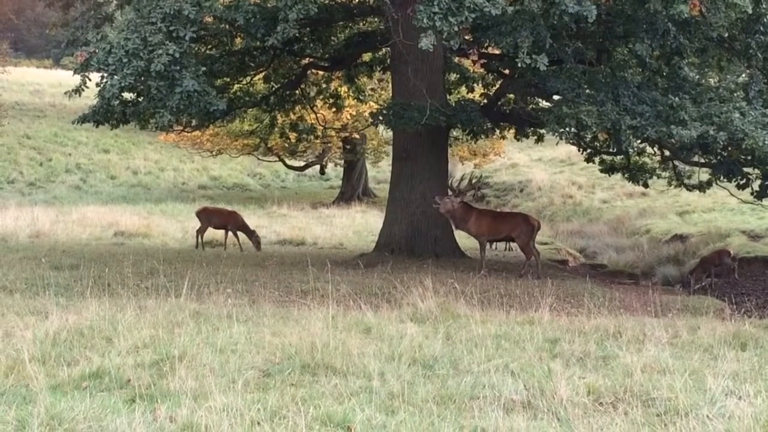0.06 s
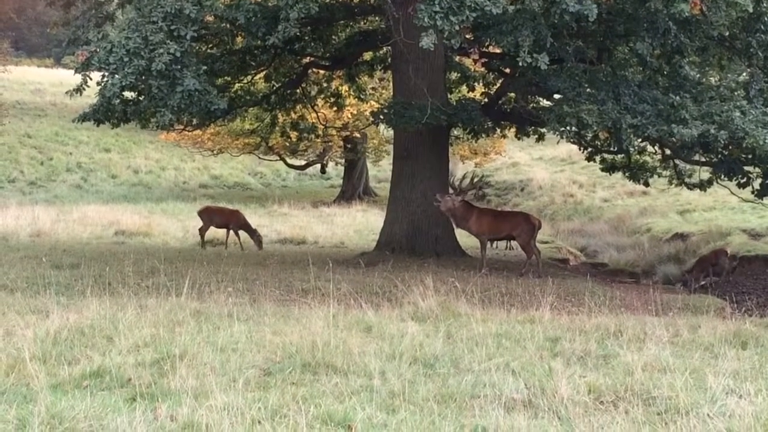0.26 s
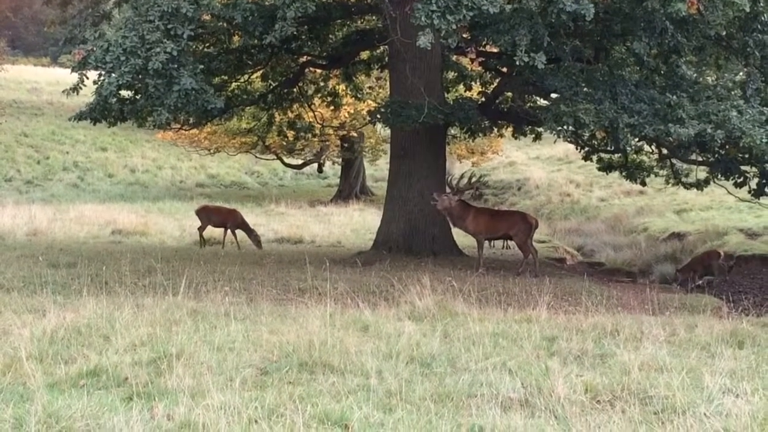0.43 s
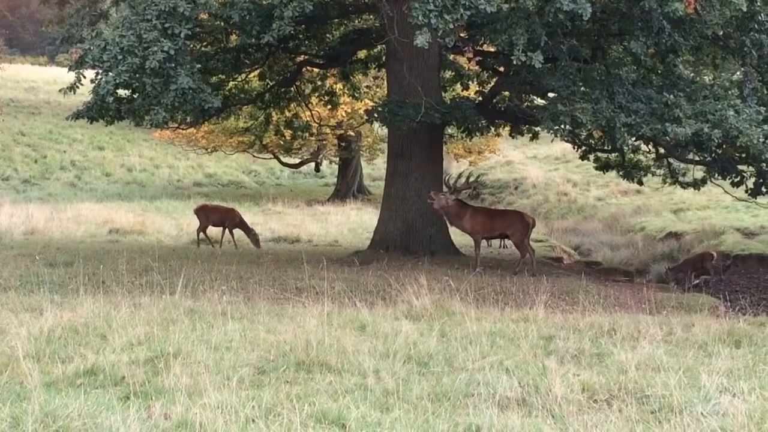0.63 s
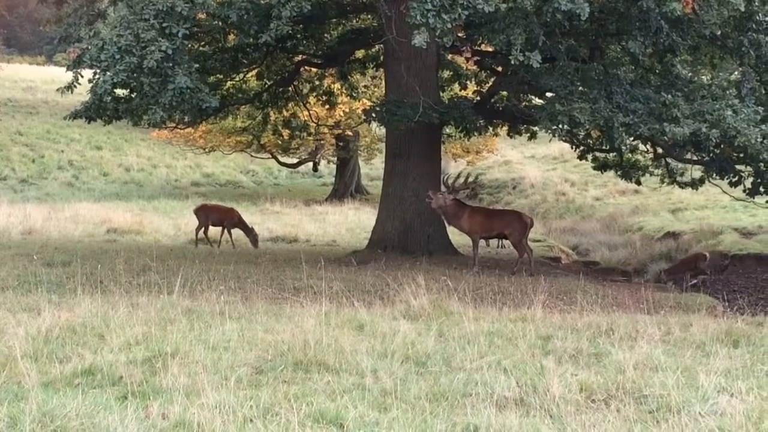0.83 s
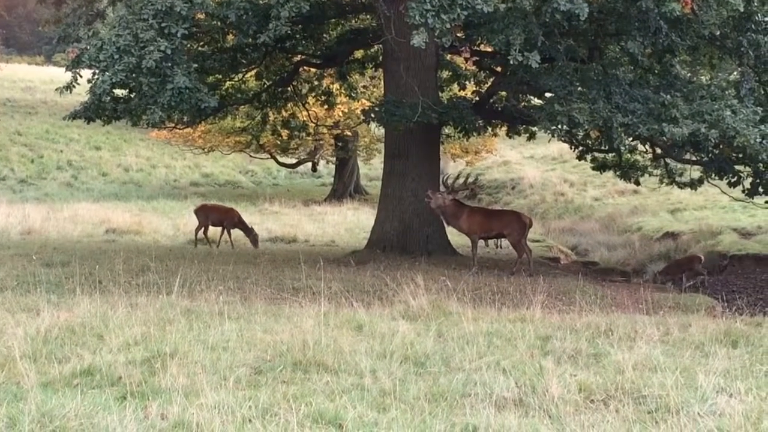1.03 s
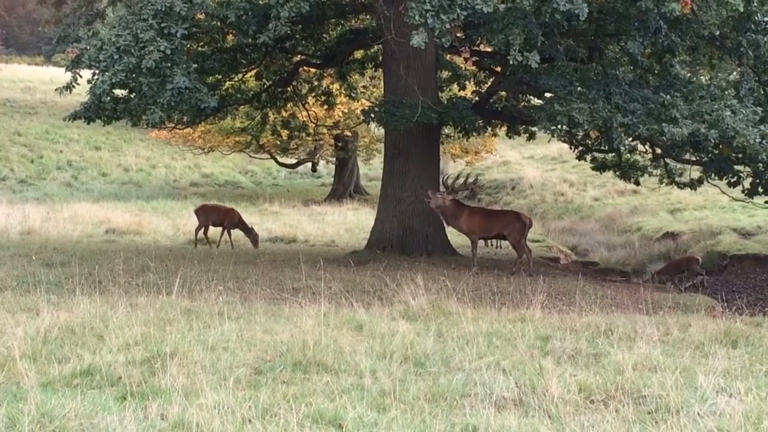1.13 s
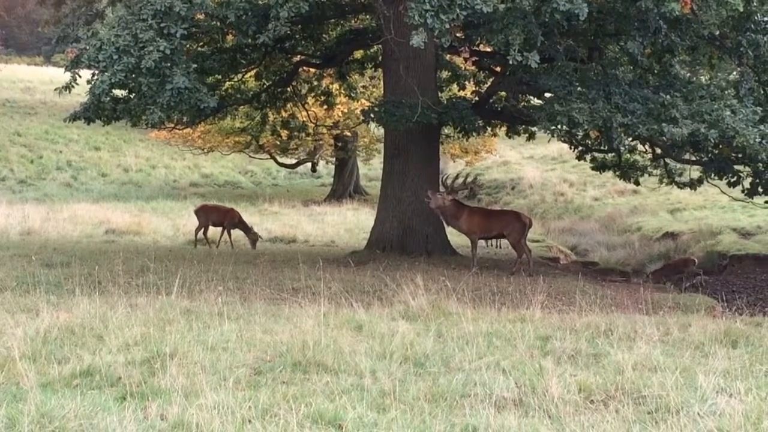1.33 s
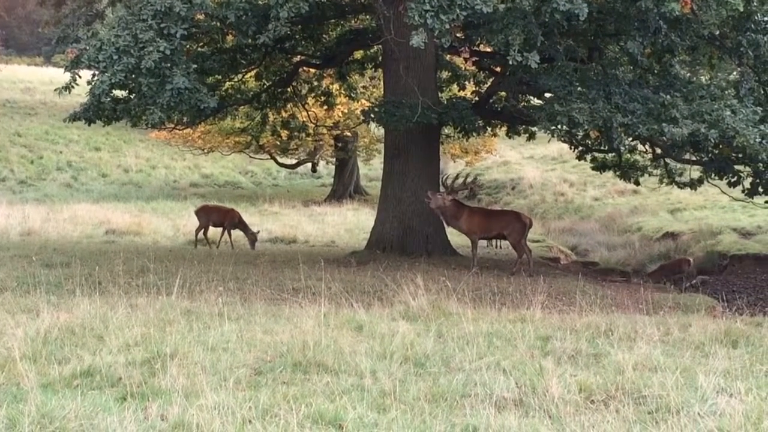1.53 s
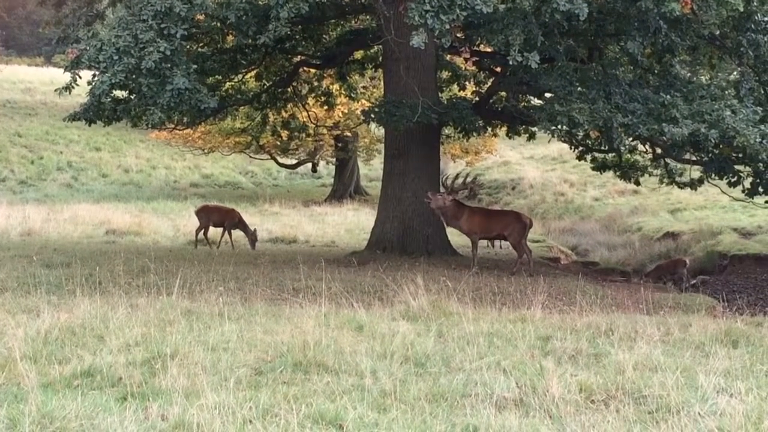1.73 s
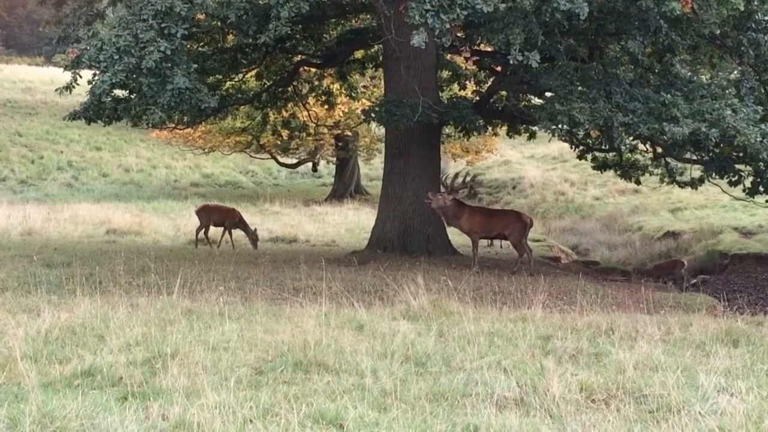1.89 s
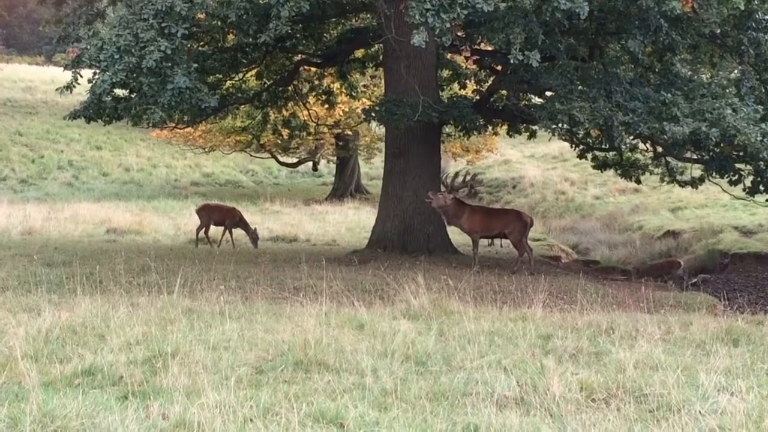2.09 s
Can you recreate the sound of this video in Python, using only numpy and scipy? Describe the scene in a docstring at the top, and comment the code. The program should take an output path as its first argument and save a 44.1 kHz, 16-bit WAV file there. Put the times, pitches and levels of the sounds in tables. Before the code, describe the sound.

A red deer stag gives one long, low, hoarse bellow in a quiet park.

```python
"""A quiet park: low distant rumble, one soft bump. Some way off, a red deer stag gives one long bellow.
His vocal folds start in slow rough slaps, rise to a clear note, then sag and grow hoarse;
he pulls his larynx down, so the throat's resonances sink. He ends on a low grunt and a rush of air.
The trees give a faint echo."""
import sys
import numpy as np
from scipy import signal
from scipy.fft import rfft, irfft
from scipy.io import wavfile
from scipy.ndimage import uniform_filter1d

SR = 44100
rng = np.random.default_rng(int(sys.argv[2]) if len(sys.argv) > 2 else 0)


def generate_wav(signal):
    """Clip the signal to [-1, 1] and save it as 16-bit WAV at the path in sys.argv[1]."""
    frames = np.transpose(np.atleast_2d(signal))
    scaled = np.clip(frames, -1, 1) * 32767
    pcm = np.round(scaled).astype(np.int16)
    wavfile.write(sys.argv[1], SR, pcm)


N = 94815
TIME = np.arange(N) / SR
HOP, FFT_SIZE = 256, 2048
FRAMES = np.arange(0, N, HOP)

# Hoarseness. Each row: time in seconds, roughness from 0 to 1.
ROUGHNESS = [
    [.15, .55],
    [.26, 0.08],
    [.34, 0.03],
    [.53, 0.07],
    [.61, 0.13],
    [.75, 0.18],
    [.86, 0.25],
    [1.0, 0.23],
    [1.25, 0.03],
    [1.55, 0.34],
    [1.72, 0.42],
    [1.8, 1],
]


def bellow(stop_s=1.785, release_s=0.029):
    """Fold slaps and breath ring the lengthening throat; five bands follow their own level curves."""
    # Each row: time in seconds, then bass, low-mid, mid, treble and top levels in dB.
    band_levels = [(0.15, -59.5, -65, -48.5, -54, -67), (0.24, -49, -45.5, -39, -45, -56.5),
                   (0.26, -47.5, -51, -37, -43, -54), (0.324, -49, -42, -36.5, -38, -49),
                   (0.448, -46.5, -33, -34, -40, -45), (0.544, -44.5, -50, -34, -35, -46.5),
                   (0.6, -42, -35, -36.5, -35, -44.5), (0.64, -42, -40.5, -43, -38, -47.5),
                   (0.692, -38, -37, -34, -41, -48), (0.752, -40, -37.5, -43, -48.5, -51),
                   (0.806, -33, -31.5, -40, -47, -50.5), (0.894, -32, -29, -38.5, -40.5, -49),
                   (0.948, -32, -30, -33, -47.5, -47), (1.05, -32.5, -33, -36.5, -39.5, -46.5),
                   (1.118, -32, -47.5, -34.5, -37.5, -45.5), (1.156, -33.5, -37, -38.5, -37, -49),
                   (1.224, -35, -41, -38.5, -48, -46.5), (1.362, -37.5, -44, -42, -43, -50),
                   (1.482, -45, -44.5, -38, -50, -55.5), (1.578, -49, -47, -45.5, -50.5, -56.5),
                   (1.694, -49, -48, -44, -52.5, -59.5), (1.748, -43.5, -41, -37, -52, -56),
                   (1.776, -40, -50, -49.5, -52.5, -59.5), (1.8, -47, -42, -49, -47.5, -49.5)]
    # The throat lengthens, then relaxes. Each row: time in seconds, resonances 1 to 9 in Hz.
    throat_hz = [(.18, 227, 636, 714, 1148, 1467, 1626, 2030, 2130, 2810),
                 (.27, 229, 627, 686, 1110, 1420, 1462, 2013, 2160, 2700),
                 (.34, 240, 491, 633, 1069, 1387, 1452, 1913, 2170, 2905),
                 (.42, 231.5, 483.6, 648.5, 1058, 1365, 1548, 1870, 1980, 2670),
                 (.53, 239, 454.8, 630.5, 962, 1350, 1534, 1803, 1874, 3150),
                 (.61, 236, 478, 607, 920, 1192, 1460, 1815, 2087, 2880),
                 (.68, 227, 429, 603, 913, 1403, 1453, 1816, 2080, 2914),
                 (.81, 219, 459.7, 592, 874, 1153, 1410, 1810, 2066, 3040),
                 (.95, 210, 427, 591, 868, 1225, 1405, 1860, 2140, 3110),
                 (1.11, 220.5, 440, 577, 865, 1206, 1296, 1860, 2056, 3246),
                 (1.30, 210.9, 460.3, 584, 897.4, 1195, 1461, 1783, 2070, 3177),
                 (1.48, 237.6, 445, 598, 902, 1265, 1453, 1924, 2120, 2900),
                 (1.66, 249, 418, 597, 918, 1340, 1543, 1890, 2120, 3000),
                 (1.745, 245, 449, 608, 907, 1400, 1540, 1904, 2245, 3240),
                 (1.79, 189, 472, 583, 931.4, 1256, 1567, 1964, 2150, 3090)]
    # One row per throat resonance: width in Hz, relative strength in dB.
    throat_shapes = [(69, 1.5), (45.6, 1), (37.6, -2.5), (63.5, 1.5), (99, -2), (61.7, -0.5), (86, 2),
                     (204, -0.5), (156, -3.5)]
    # Steady resonances. Each row: centre in Hz, width in Hz, relative strength in dB.
    chest_rattle = [(130, 125, -11.5), (280, 56, -1.5)]
    open_mouth = [(867, 370, -18.5)]
    palate = [(2417.6, 62, -4)]
    mouth_and_nose = [(2850, 220, -13), (3150, 160, -13), (3380, 260, -11), (3900, 600, -25),
                      (4950, 550, -29)]
    breath_modes = [(5570, 500, -25), (6990, 510, -31), (8260, 650, -37), (10230, 2800, -42)]
    chest = (131, 17, -14)

    formants = [(curve(throat_hz, k + 1)[FRAMES], width_hz, db)
                for k, (width_hz, db) in enumerate(throat_shapes)]
    f1, f2, f3, f4, f5, f6, f7, f8, f9 = formants
    slaps, puffs = vocal_folds()
    slaps, smeared_puffs = smear(slaps), smear(puffs)
    bass = resonate(slaps + 0.64 * puffs, [chest, f1]) + resonate(puffs, chest_rattle)
    low_mid = resonate(slaps + 0.28 * puffs, [f2, f3])
    mid = resonate(slaps + puffs, [f4, f5, f6] + open_mouth)
    treble = resonate(slaps + 0.77 * smeared_puffs, [f7, f8] + palate)
    breath = 5.2 * smeared_puffs
    top = resonate(slaps + breath, [f9] + mouth_and_nose) + resonate(breath, breath_modes)
    bands = (bass, low_mid, mid, treble, top)
    release = np.exp(-np.maximum(TIME - stop_s, 0) / release_s)
    return release * sum(at_level(band, curve(band_levels, k + 1)) for k, band in enumerate(bands))


def vocal_folds(start_s=0.1505, harmonics=110, wander_hz=130):
    """Uneven slaps of the folds, and the puff of air each lets through over a steady leak."""
    # Each row: time in seconds, fold rate in Hz.
    pitch = [(.15, 47.2), (.19, 82.1), (.225, 104.7), (.26, 119.7), (.32, 127.4), (.388, 129.3),
             (.496, 130.8), (.584, 128.9), (.648, 123.6), (.752, 116.8), (.808, 114), (.868, 112.3),
             (.93, 109.1), (1.04, 107.8), (1.174, 105.5), (1.3, 103.8), (1.43, 99.64), (1.55, 97.1),
             (1.69, 95.57), (1.81, 87)]
    jitter, shimmer = 0.02, 0.24  # relative rms at half roughness
    leak, puff_decay_cycles = 0.38, 0.68
    rough = curve(ROUGHNESS)
    voiced = TIME > start_s
    rate_hz = curve(pitch) * (1 + jitter * 2 * rough * wander(wander_hz))
    cycles = np.cumsum(rate_hz * voiced) / SR
    offset = (cycles + 0.5) % 1 - 0.5
    # Band-limited pulse train: a sum of equal harmonics.
    pulses = (harmonics + 0.5) * np.sinc((2 * harmonics + 1) * offset) / np.sinc(offset) - 0.5
    slaps = pulses / np.sqrt(harmonics) * (1 + shimmer * 2 * rough * wander(wander_hz))
    airflow = leak + np.exp(-(cycles % 1) / puff_decay_cycles)
    puffs = rough * unit_rms(airflow * rng.standard_normal(N))
    return slaps * voiced, puffs * voiced


def smear(x, t60_s=0.18, highpass_hz=1800):
    """A short noise tail blurs the treble, most where the voice is hoarse."""
    t = TIME[:SR // 4]
    tail = rng.standard_normal(len(t)) * gain_of(-60 * t / t60_s)
    tail = signal.sosfilt(signal.butter(2, highpass_hz, "high", fs=SR, output="sos"), tail)
    send = gain_of(-1.5) * (0.82 + 2.7 * curve(ROUGHNESS))
    return x + signal.fftconvolve(x * send, tail / np.linalg.norm(tail))[:N]


def resonate(x, resonances, notch_hz=1584, notch_width_hz=23, notch_db=-17.5):
    """Airway resonances (Hz, steady or per frame; width in Hz; dB), notched by the nose's side branch."""
    bins_hz = np.fft.rfftfreq(FFT_SIZE, 1 / SR)
    power = 0
    for centre_hz, width_hz, db in resonances:
        detuning = 2 * (bins_hz - np.reshape(centre_hz, (-1, 1))) / width_hz
        power = power + gain_of(2 * db) / (1 + detuning ** 2) ** 2
    notch = gain_of(notch_db * np.exp(-((bins_hz - notch_hz) / notch_width_hz) ** 2))
    cepstrum = irfft(np.log(np.sqrt(power) * notch + 1e-5))
    minimum_phase = np.exp(rfft(2 * cepstrum[:, :FFT_SIZE // 2], FFT_SIZE) - cepstrum[:, :1])
    pieces = np.pad(x, (HOP, 2 * HOP))[FRAMES[:, None] + np.arange(2 * HOP)]
    pieces *= signal.get_window("hann", 2 * HOP)
    out = np.zeros(N + 2 * FFT_SIZE)
    for at, piece in zip(FRAMES, irfft(rfft(pieces, FFT_SIZE) * minimum_phase)):
        out[at:at + FFT_SIZE] += piece
    return out[HOP:HOP + N]


def at_level(x, db, window_samples=1300):
    """Holds the running rms of x near a level curve."""
    power = uniform_filter1d(uniform_filter1d(x ** 2, window_samples), window_samples)
    return x * gain_of(db) / np.sqrt(abs(power) + np.mean(x ** 2) / 100)


def grunt():
    """The closing grunt drops about an octave."""
    # Each row: start in seconds, length in seconds, first and last pitch in Hz, peak in dB.
    grunts = [(1.75, 0.057, 250, 127, -41)]
    return thump(*grunts[0])


def exhale():
    """Air rushes out as the grunt ends: bright at the mouth, rattling in the chest."""
    # Each row: centre in seconds, width in seconds, hiss level in dB, rattle level in dB.
    rushes = [(1.782, 0.018, -66, -44.5)]
    centre_s, width_s, hiss_db, rattle_db = rushes[0]
    noise = rng.standard_normal(N)
    hiss = gain_of(hiss_db) * unit_rms(resonate(noise, [(4440, 2200, 0), (8270, 5500, -16)]))
    rattle = gain_of(rattle_db) * unit_rms(resonate(noise, [(169.6, 88.6, 0)]))
    return (hiss + rattle) * np.exp(-((TIME - centre_s) / width_s) ** 2)


def tree_echo(x, rise_s=0.044):
    """Trees return a faint diffuse echo that lasts longest in the low mids."""
    # Each row: frequency in Hz, T60 in seconds.
    decay_times = [(150, 0.39), (500, 0.97), (1500, 0.45), (3000, 0.72), (8000, 0.2)]
    hz, t, spectra = signal.stft(rng.standard_normal(SR), SR, nperseg=256)
    decay = gain_of(-60 * t / spectrum_at(decay_times, hz)[:, None])
    tail = signal.istft(spectra * decay, SR, nperseg=256)[1][:SR]
    tail *= np.minimum(TIME[:SR] / rise_s, 1)
    echo_gain = gain_of(-12.5) / 2
    return echo_gain * signal.fftconvolve(x, tail / np.linalg.norm(tail))[:N]


def bump():
    """A soft low bump before the call."""
    # Each row: start in seconds, length in seconds, first and last pitch in Hz, peak in dB.
    bumps = [(.038, .05, 89, 80, -49)]
    return thump(*bumps[0])


def park_air(level_db=-59.5):
    """Distant rumble and faint hiss."""
    # Each row: frequency in Hz, relative spectral density in dB.
    density = [(20, -41.5), (50, -11.5), (68, -9.5), (82, 4.5), (105, -13), (170, -8), (300, -24),
               (520, -16.5), (1000, -20.5), (2800, -26), (4500, -37.5), (8000, -43), (15000, -45)]
    gains = gain_of(spectrum_at(density, np.fft.rfftfreq(N, 1 / SR)))
    return gain_of(level_db) * unit_rms(irfft(rfft(rng.standard_normal(N)) * gains, N))


def thump(start_s, length_s, from_hz, to_hz, db):
    """A short gliding tone that swells and dies."""
    progress = np.clip((TIME - start_s) / length_s, 0, 1)
    phase = 2 * np.pi * np.cumsum(from_hz + (to_hz - from_hz) * progress) / SR
    return gain_of(db) * np.sin(np.pi * progress) ** 2 * np.sin(phase)


def wander(rate_hz):
    """Random unsteadiness up to about rate_hz, at unit rms."""
    hz = np.fft.rfftfreq(N, 1 / SR)
    band = hz / (hz + rate_hz / 10) / (1 + (hz / rate_hz) ** 4)
    return unit_rms(irfft(rfft(rng.standard_normal(N)) * band, N))


def curve(table, column=1):
    """One column of a time table, at every sample."""
    table = np.array(table)
    return np.interp(TIME, table[:, 0], table[:, column])


def spectrum_at(table, hz):
    """Interpolates a table over log frequency."""
    table_hz, values = np.transpose(table)
    return np.interp(np.log(hz + 1), np.log(table_hz + 1), values)


def gain_of(db):
    return 10 ** (np.asarray(db) / 20)


def unit_rms(x):
    return x / np.sqrt(np.mean(x ** 2) + 1e-20)


def scene():
    """The stag, his echo and the park, in mono."""
    stag = bellow() + grunt() + exhale()
    return (stag + tree_echo(stag) + bump() + park_air())[None]


def record(dry, cutoff_hz=15250):
    """Steep low-pass."""
    lowpass = signal.firwin(511, cutoff_hz, window=("kaiser", 9), fs=SR)
    return signal.oaconvolve(dry, lowpass[None], "same")


dry = scene()
out = record(dry)
generate_wav(out)
```